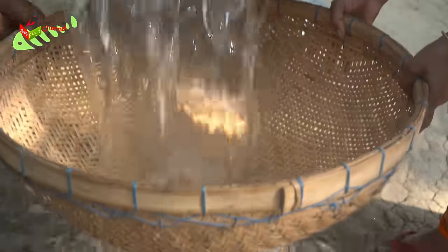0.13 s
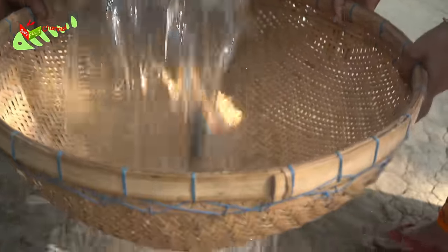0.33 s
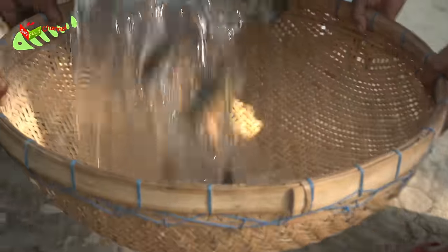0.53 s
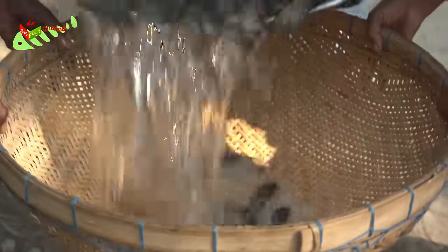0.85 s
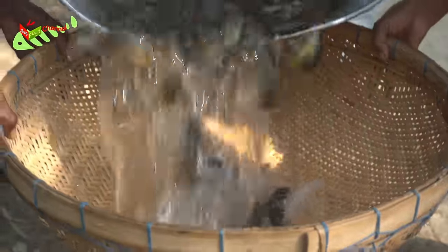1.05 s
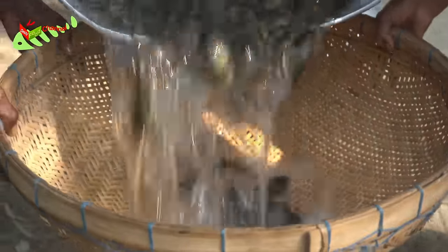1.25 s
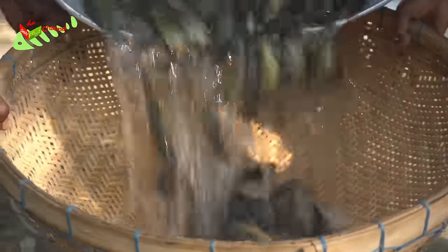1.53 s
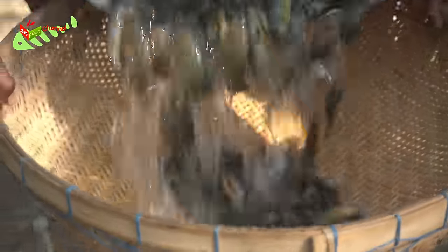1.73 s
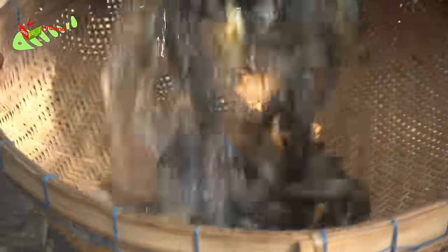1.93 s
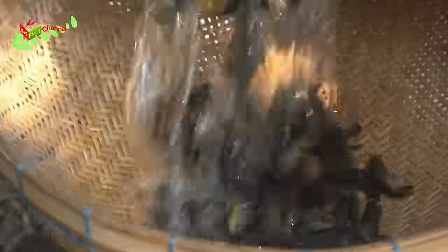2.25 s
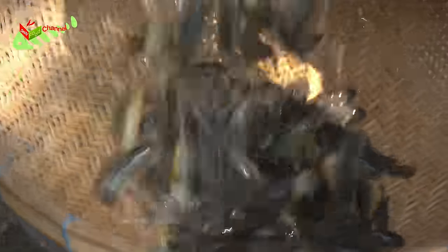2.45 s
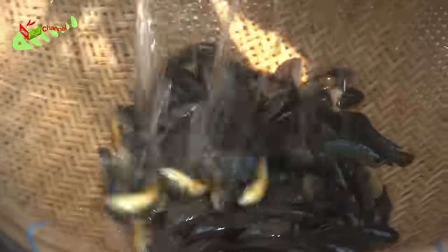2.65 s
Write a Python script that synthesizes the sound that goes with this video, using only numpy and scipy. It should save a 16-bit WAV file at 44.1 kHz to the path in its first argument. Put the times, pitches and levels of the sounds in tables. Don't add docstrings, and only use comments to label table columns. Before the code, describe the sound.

A close, bright pour of water splashes through a wicker basket throughout, with crackling drops, low patter and soft fish thuds; thin bird chirps come from the right in an open yard.

```python
import sys
import numpy as np
from scipy import signal
from scipy.fft import rfft, irfft
from scipy.io import wavfile
from scipy.ndimage import uniform_filter1d

SR = 44100
rng = np.random.default_rng(int(sys.argv[2]) if len(sys.argv) > 2 else 0)


def invert_db(level):
    return 10 ** (np.asarray(level, dtype=float) / 20)


def materialize(psi):
    bounded = np.clip(np.atleast_2d(psi).T, -1, 1)
    quanta = np.round(bounded * 32767).astype(np.int16)
    wavfile.write(sys.argv[1], SR, quanta)


N = 123479


def evened(x):
    return x / np.sqrt(np.mean(x ** 2) + 1e-20)


def smooth(x, *sizes, axis=-1):
    for size in sizes:
        x = uniform_filter1d(x, size=size, axis=axis)
    return x


def read(points, hz):
    f, value = np.transpose(points)
    return np.interp(np.log(hz + 1), np.log(f + 1), value)


def add(mix, s, sound):
    part = mix[..., max(round(s * SR), 0):][..., :sound.shape[-1]]
    part += sound[..., :part.shape[-1]]


# frequency in Hz, left-right likeness 0 to 1.
LIKENESS = [(60, 1), (240, 0.99), (950, 0.95), (3770, 0.74), (15000, 0.35)]
# frequency in Hz, left minus right in dB.
LEAN = [(60, -0.5), (380, -0.5), (2380, -3), (15000, -5.5)]


def ports(pair, colour):
    hz = np.fft.rfftfreq(N, 1 / SR)
    a, b = rfft(pair)
    half_angle = np.arccos(np.clip(read(LIKENESS, hz), 0, 1)) / 2
    lean = invert_db(read(LEAN, hz) / 2)
    mid, side = np.cos(half_angle) * a, np.sin(half_angle) * b
    return irfft(invert_db(read(colour, hz)) * np.array([(mid + side) * lean, (mid - side) / lean]), N)


LARGEST = 2.4


def clicks(per_s, spread_db, shape):
    size_db = spread_db * np.minimum(rng.exponential(1, shape), LARGEST)
    size = invert_db(size_db) * rng.choice([-1., 1.], shape)
    return size * (rng.random(shape) < per_s / SR)


def bubble(hz, t, cycles=10):
    u = t * hz / cycles
    return 8 * u * np.exp(-3 * u) * np.sin(2 * np.pi * hz * t * (1 + 0.039 * u))


DROPS_PER_S, DROP_SPREAD_DB = 6000, 3.6
DROP_CYCLES, DROP_TILT = 5, 0.77


def drops():
    train = clicks(DROPS_PER_S, DROP_SPREAD_DB, (2, N))
    kind = rng.integers(0, 28, (2, N))
    out = np.zeros((2, N))
    for k, hz in enumerate(np.geomspace(600, 15000, 28)):
        cycles = DROP_CYCLES * np.sqrt(hz / 2500)
        u = np.arange(0, 3 * cycles, hz / SR) / cycles
        chirp = np.sin(2 * np.pi * cycles * u * (1 + 0.091 * u))
        grain = hz ** DROP_TILT / np.sqrt(cycles) * u * np.exp(-3 * u) * chirp
        out += signal.oaconvolve(train * (kind == k), grain[None], axes=1)[:, :N]
    return evened(out)


# time in seconds, flow in dB, extra hollow gurgle in dB.
FLOW = [(0, -25, -9), (.15, -25, -9.5), (.35, -24, -5), (.6, -24.5, -6.5), (.8, -23.5, -7),
        (1.05, -22.5, -7), (1.3, -23, -4.5), (1.55, -24.5, -3), (1.9, -24, -4.5), (2.18, -23, -3.5),
        (2.28, -24.5, -9), (2.6, -25, -4.5), (2.8, -27, -8)]
# frequency in Hz, level in dB per Hz.
SPRAY = [(400, -38), (700, -15.5), (1500, -7), (1800, -3), (3000, -1.5), (4200, -3.5), (8000, -6),
         (15800, -18)]
SPRAY_DB, DROPS_DB = 5, 1.5
TICKS_DB, TICKS_PER_S = -3, 700
GURGLE_HZ, GURGLE_OCTAVES = 1570, 1
PATCH_DB, FLICKER_DB, SURGE_DB = 0.43, 0.94, 0.2


def stream():
    raw = rng.standard_normal((2, N)) + invert_db(DROPS_DB) * drops()
    raw = raw + invert_db(TICKS_DB) * evened(clicks(TICKS_PER_S, DROP_SPREAD_DB, N))
    hz, t, z = signal.stft(raw, SR, nperseg=256, noverlap=192)
    cells = z.shape[1:]
    patches = evened(smooth(smooth(rng.standard_normal(cells), 5, axis=0), 14))
    wide = smooth(rng.standard_normal(cells), 80, axis=0)
    flicker, surge = evened(smooth(wide, 4)), evened(smooth(wide, 40))
    s, flow_db, gurgle_db = np.transpose(FLOW)
    hollow = np.exp(-(np.log2((hz + 1) / GURGLE_HZ) / GURGLE_OCTAVES) ** 2)[:, None]
    field_db = np.interp(t, s, flow_db) + hollow * np.interp(t, s, gurgle_db - gurgle_db.mean())
    field_db = field_db + PATCH_DB * patches + FLICKER_DB * flicker + SURGE_DB * surge
    water = signal.istft(z * invert_db(field_db), SR, nperseg=256, noverlap=192)[1][:, :N]
    return evened(ports(water, SPRAY)) * invert_db(SPRAY_DB + flow_db.mean())


PATTER_FOLLOW = 0.25


def gurgle_gain():
    s, _, gurgle_db = np.transpose(FLOW)
    return invert_db(PATTER_FOLLOW * np.interp(np.arange(N) / SR, s, gurgle_db - gurgle_db.mean()))


# frequency in Hz, level in dB per Hz.
RUMBLE = [(20, -6), (60, -5.5), (203, 2), (320, -2.5), (460, 3), (680, 0.5), (1000, -36.5)]
RUMBLE_DB, SHAKE_DB = -43.5, 4


def wash():
    shake = evened(smooth(rng.standard_normal(N), 1200, 1200))
    rumble = evened(ports(rng.standard_normal((2, N)), RUMBLE))
    return invert_db(RUMBLE_DB + SHAKE_DB * shake) * rumble


PUSH_S, PUSH_CYCLES = .002, 1.7


def ring(modes, detune=1):
    t = np.arange(5000) / SR
    out = 0
    for hz, db, t60 in modes:
        swing_up = np.sin(np.pi / 2 * np.minimum(t / (PUSH_S + PUSH_CYCLES / hz), 1)) ** 2
        out = out + invert_db(db - 60 * t / t60) * np.sin(2 * np.pi * hz * detune * t) * swing_up
    return out


# frequency in Hz, level in dB, t60 in seconds.
DRUM = [(200, 0, .045), (235, -7, .035)]
SAG = [(110, 0, .075)]
KNOCK = [(455, 0, .05), (790, -3, .04), (1120, -4, .035), (620, -3, .025), (320, -8, .025)]
PATTER_MIX_DB = [3, 15, -14]
PATTER_DB, PATTER_PER_S, PATTER_SPREAD_DB = -54.5, 170, -3


def patter():
    out = np.zeros(N)
    for db, mode in zip(PATTER_MIX_DB, DRUM[:1] + KNOCK):
        taps = clicks(PATTER_PER_S, PATTER_SPREAD_DB, N)
        out += invert_db(db) * signal.oaconvolve(taps, ring([mode]))[:N]
    return invert_db(PATTER_DB) * evened(out)


# time in seconds, drum in dB, sag in dB, knock in dB.
THUDS = [(0.005, -32, -35, -24), (0.045, -39, -32, -25), (0.082, -37, -51, -23.5),
         (0.181, -20.5, -23.5, -18), (0.316, -27, -30.5, -27.5), (0.418, -28, -91, -21),
         (0.437, -24, -49, -26), (0.452, -21, -38, -24.5), (0.612, -28, -50, -22.5),
         (0.651, -113, -105, -21.5), (0.696, -20, -19, -16), (0.762, -36, -43, -17),
         (0.84, -49, -48, -23.5), (0.941, -19, -53, -25), (1.122, -22.5, -28, -25), (1.201, -22, -31, -28),
         (1.292, -18, -27, -31), (1.406, -23.5, -22, -22), (1.429, -30, -36, -18), (1.477, -30, -45, -28),
         (1.562, -42, -60, -26), (1.672, -16, -62, -21), (1.697, -23, -25.5, -20.5), (1.879, -19, -30, -36),
         (1.984, -20, -40, -24.5), (2.184, -18.5, -40, -23), (2.377, -53, -101, -23.5),
         (2.552, -21, -25, -18), (2.601, -45, -74, -50), (2.617, -31, -57, -27)]
LANDING_DB = [2, -2.5, 0]
DETUNE, LEAD_S = .07, 0.002046


def fish():
    out = np.zeros(N)
    bends = 1 + DETUNE * rng.standard_normal((len(THUDS), 3))
    for (s, *levels_db), bend in zip(THUDS, bends):
        for db, trim_db, modes, detune in zip(levels_db, LANDING_DB, (DRUM, SAG, KNOCK), bend):
            start = s + LEAD_S - PUSH_CYCLES / modes[0][0]
            add(out, start, invert_db(db + trim_db) * ring(modes, detune))
    return out


def basket():
    follow = gurgle_gain()
    return wash() * follow + (patter() * follow + fish()) * invert_db([[.2], [-.2]])


SPATTER_OCTAVES = .6


def spatter_noise(noise, hz):
    centre_hz = rng.uniform(6000, 11000)
    band = np.exp(-(np.log2((hz + 1) / centre_hz) / SPATTER_OCTAVES) ** 2)
    return irfft(rfft(noise[0] + 1.4 * noise) * band)


# time in seconds, slap in dB, slap pitch in Hz, spatter in dB.
SPLATS = [(0.019, -12, 2860, -15), (0.076, -11.5, 3100, -12), (0.216, -12.5, 2550, -46),
          (0.257, -22, 2720, -12), (0.339, -13, 2440, -23), (0.422, -8.5, 2510, -12),
          (0.48, -12.5, 2000, -30), (0.761, -7.5, 2190, -31), (0.934, -8.5, 2540, -13),
          (1.21, -24, 2800, -33), (1.25, -15.5, 1557, -21), (1.31, -8.5, 2460, -26), (1.43, -9.5, 2170, -5),
          (1.555, -7, 2107, -29), (1.664, -12.5, 1724, -30), (1.748, -7.5, 2090, -34),
          (1.779, -10, 2870, -30), (1.849, -35, 3200, -8), (2.169, -16, 2600, -29), (2.199, -22, 2190, 1),
          (2.37, -11.5, 2410, -14), (2.385, -14, 2060, -53), (2.405, -18, 1820, -2),
          (2.444, -11, 2910, -4.5), (2.474, -17, 2810, -21), (2.553, -17, 2970, -14),
          (2.573, -18, 3320, -15), (2.606, -11, 2305, -3), (2.635, -18.5, 1690, -7), (2.681, -13, 2730, -7),
          (2.717, -17.5, 2930, -32), (2.758, -46, 2430, -10)]
SLAP_DB, SPATTER_DB = -3, -14
SLAP_RISE_S, SPATTER_FALL_S = 0.0019, .006
BURST_S, BURST_OCTAVES, BURST_DB = .007, .45, -10


def splats():
    out, t = np.zeros((2, N)), np.arange(2048) / SR
    hz, lean = np.fft.rfftfreq(2048, 1 / SR), invert_db([[1.1], [-1.1]])
    clusters = rng.standard_normal((len(SPLATS), 7, 3))
    for (s, slap_db, slap_hz, spatter_db), cluster in zip(SPLATS, clusters):
        gain = invert_db(slap_db + SLAP_DB) * lean
        add(out, s, gain * bubble(slap_hz, t, 7.0))
        for late, octaves, side in cluster:
            pan = invert_db(BURST_DB + 2 * side * np.array([[1], [-1]]))
            burst_hz = slap_hz * 2 ** (BURST_OCTAVES * octaves)
            add(out, s + BURST_S * late, gain * pan * bubble(burst_hz, t))
        spatter = evened(spatter_noise(rng.standard_normal((2, 2048)), hz))
        envelope = np.exp(-t / SPATTER_FALL_S) * (1 - np.exp(-(t / SLAP_RISE_S) ** 2))
        add(out, s, invert_db(spatter_db + SPATTER_DB) * spatter * envelope * lean)
    return out


# time in seconds, peak in dB.
SNAPS = [(0.0288, -13), (0.0498, -10), (0.114, -12), (0.177, -9.5), (0.221, -17), (0.2583, -10),
         (0.2763, -13), (0.318, -12), (0.3431, -8), (0.3725, -17), (0.471, -5), (0.595, -13), (0.6424, -18),
         (0.7406, -8), (0.7901, -17), (0.9183, -8), (1.126, -8), (1.2236, -8), (1.3404, -9), (1.3838, -21),
         (1.4326, -6), (1.6355, -8), (1.8013, -14), (1.8505, -7), (1.8576, -9), (1.913, -10), (1.9774, -15),
         (2.1745, -11), (2.2017, -7), (2.2677, -22), (2.2846, -10), (2.3191, -11), (2.374, -7.5),
         (2.4224, -11), (2.446, -6.5), (2.5585, -19), (2.575, -12), (2.6343, -6), (2.6898, -6.5),
         (2.717, -7.5), (2.7596, -16)]
# frequency in Hz, level in dB per Hz.
SNAP_COLOUR = [(700, -24), (2500, -3), (6000, 5), (15500, -27)]
SNAP_TRIM_DB, SNAP_FALL_S = -9.5, 0.0029
SNAP_OWN = 1.9


def snaps():
    out, t, hz = np.zeros((2, N)), np.arange(1024) / SR, np.fft.rfftfreq(1024, 1 / SR)
    colour = invert_db(read(SNAP_COLOUR, hz) + read(LEAN, hz) * np.array([[.5], [-.5]]))
    envelope = (t / SNAP_FALL_S * np.exp(1 - t / SNAP_FALL_S)) ** 2
    for (s, db), noise in zip(SNAPS, rng.standard_normal((len(SNAPS), 3, 1024))):
        crack = evened(irfft(rfft(noise[0] + SNAP_OWN * noise[1:]) * colour))
        add(out, s, invert_db(db + SNAP_TRIM_DB) * crack * envelope)
    return out


# time in seconds, peak in dB, pitch in Hz.
PLOPS = [(0.159, -15.5, 1380), (0.18, -23, 704), (0.324, -15.5, 1290), (0.41, -16.5, 850),
         (0.433, -14.5, 1110), (0.527, -15, 1280), (0.6, -20, 1330), (0.613, -20, 846), (0.643, -19, 1480),
         (0.685, -13.5, 1260), (0.769, -14, 1080), (0.836, -19.5, 1370), (0.893, -21.5, 960),
         (1.25, -22, 1490), (1.396, -20, 1270), (1.432, -18.5, 972), (1.508, -27, 1310), (1.55, -27, 1520),
         (1.599, -20, 1330), (1.64, -15, 1360), (1.669, -15.5, 995), (1.697, -26, 1280), (1.728, -21, 1390),
         (1.755, -10, 1074), (1.977, -11.5, 1430), (2.175, -21, 1290), (2.476, -17.5, 1150),
         (2.555, -24, 1350), (2.607, -16, 1140), (2.795, -20, 1270)]
PLOP_TRIM_DB, PLOP_CYCLES = -2, 4.5


def bubbles():
    out, t = np.zeros(N), np.arange(1500) / SR
    for s, db, hz in PLOPS:
        add(out, s - LEAD_S, invert_db(db + PLOP_TRIM_DB) * bubble(hz, t, PLOP_CYCLES))
    return out * invert_db([[.6], [-.6]])


# time in seconds, pitch in Hz, level in dB.
WHISTLES = [
    [(.485, 3550, -40), (.515, 3780, -27), (.535, 3750, -40)],
    [(.51, 2450, -36), (.543, 3180, -20), (.572, 3340, -18), (.59, 3270, -25), (.62, 3290, -18),
     (.64, 3330, -30)],
    [(.738, 3300, -32), (.755, 3340, -19), (.775, 3320, -30)],
    [(.85, 3480, -36), (.875, 3590, -28), (.94, 3790, -26), (.975, 3770, -38)],
    [(.945, 2600, -33), (.985, 3200, -20), (1.018, 3380, -25), (1.045, 3370, -23), (1.07, 3200, -34)],
    [(1.385, 3760, -36), (1.405, 3750, -26), (1.43, 3740, -29), (1.45, 3780, -38)],
    [(1.415, 3950, -36), (1.44, 4060, -25), (1.465, 4150, -36)],
    [(1.485, 3860, -34), (1.5, 3840, -21), (1.52, 3760, -26), (1.545, 3690, -21), (1.575, 3690, -26),
     (1.595, 3730, -36)],
    [(2.428, 5050, -32), (2.445, 4450, -20), (2.47, 4250, -24), (2.54, 4040, -28), (2.6, 3840, -32)],
]
UNDERTONE_DB = [-14, -30, -30, -10, -30, -20, -30, -14, -30]
BIRD_DB, BIRD_LEFT_DB, BIRD_LAG_S = 3.5, -4, .00017
YARD_DB, YARD_T60_S, FLUTTER_DB = -7, .4, 2.5


def bird():
    song = np.zeros(N)
    for whistle, under_db in zip(WHISTLES, UNDERTONE_DB):
        s, hz, db = np.transpose(whistle)
        t = np.arange(s[0], s[-1], 1 / SR)
        flutter_db = FLUTTER_DB * evened(smooth(rng.standard_normal(len(t)), 150, 150))
        phase = 2 * np.pi * np.cumsum(smooth(np.interp(t, s, hz), 300)) / SR
        tone = np.sin(phase) + invert_db(under_db) * np.sin(phase * 2 / 3)
        add(song, s[0], invert_db(np.interp(t, s, db) + BIRD_DB + flutter_db) * tone)
    left = invert_db(BIRD_LEFT_DB) * np.interp(np.arange(N) - BIRD_LAG_S * SR, np.arange(N), song)
    taps = clicks(2000, 0, (2, SR // 2)) * invert_db(-60 * np.arange(SR // 2) / SR / YARD_T60_S)
    taps[:, :400] = 0
    yard = signal.fftconvolve(song[None], taps / np.linalg.norm(taps[0]), axes=1)[:, :N]
    return np.array([left, song]) + invert_db(YARD_DB) * yard


def scene():
    return stream() + basket() + splats() + snaps() + bubbles() + bird()


def roll_off(x):
    return signal.sosfilt(signal.butter(12, 16220, fs=SR, output="sos"), x)


BASS_CUT_HZ, EDGE_HZ = 53, 16150


def record(dry):
    high_pass = signal.butter(2, BASS_CUT_HZ, "high", fs=SR, output="sos")
    cut = signal.sosfilt(high_pass, dry)
    cut = signal.oaconvolve(cut, signal.firwin(301, EDGE_HZ, fs=SR)[None], "same")
    return roll_off(cut)


dry = scene()
out = record(dry)
materialize(out)
```